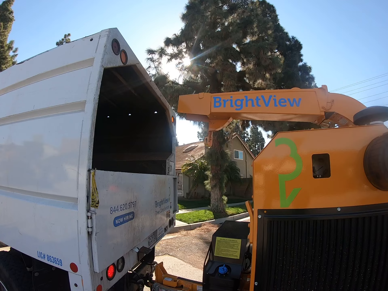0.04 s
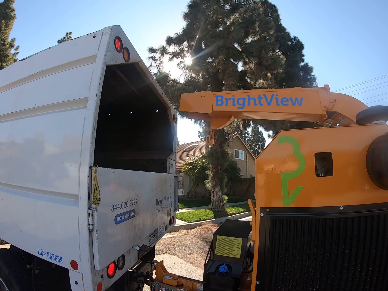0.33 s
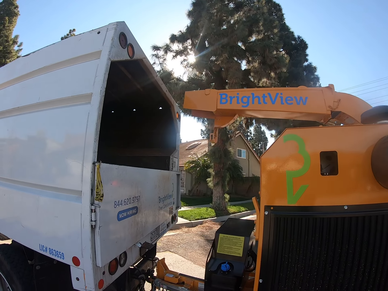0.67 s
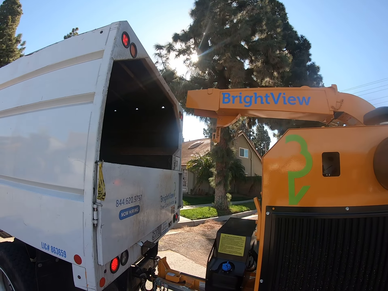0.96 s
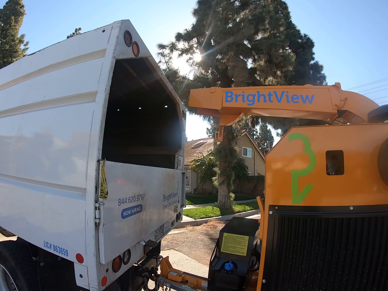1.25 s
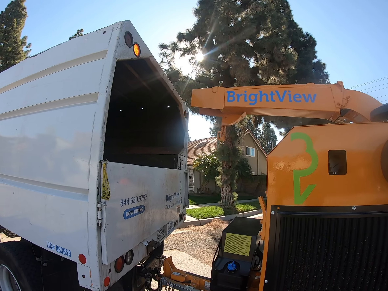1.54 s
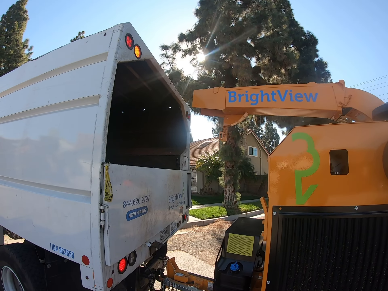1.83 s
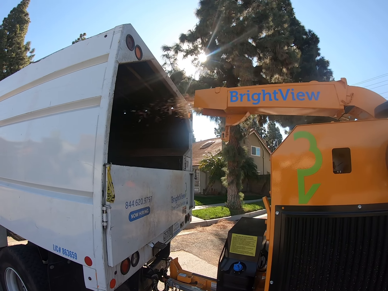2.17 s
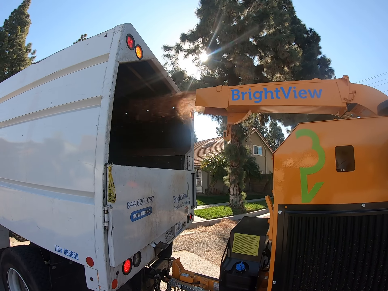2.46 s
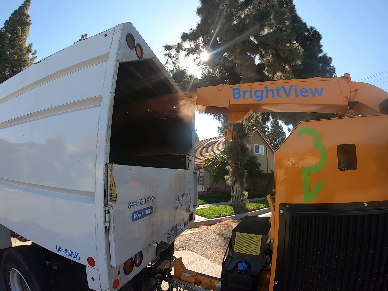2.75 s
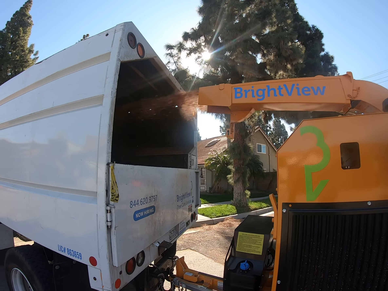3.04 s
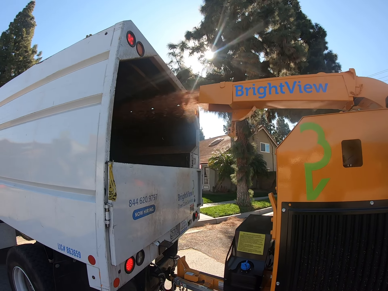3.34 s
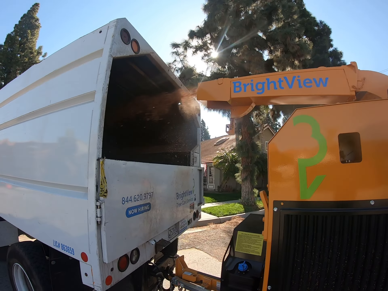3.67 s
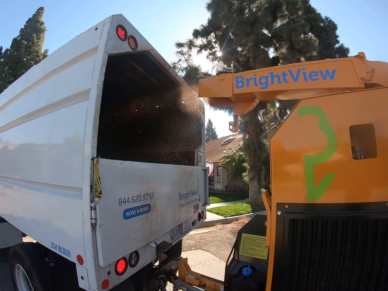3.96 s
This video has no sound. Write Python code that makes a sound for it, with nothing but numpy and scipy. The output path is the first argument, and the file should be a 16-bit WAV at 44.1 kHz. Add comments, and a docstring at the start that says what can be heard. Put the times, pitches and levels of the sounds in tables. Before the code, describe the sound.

A diesel wood chipper fades in at about 0.2 seconds, a strong steady hum over engine roar and faint air hiss. At 2.1 seconds a branch splinters and grinds through; the hum drops in pitch and fades as the engine labours. Chips spray into a truck, louder from 3 seconds, with a few metallic ticks. Low gusts buffet near 0.6 and 2.7 seconds, then the sound widens to stereo.

```python
"""Diesel wood chipper taking a branch

A chipper runs beside a truck, its drum chopping the air into one strong hum over the engine's tones
and roar. At 2.1 s a branch is fed in: the knives fracture it, the load drags the speed down and the
hum fades, while chips spray from the hissing chute into the truck box. A few gusts buffet low down.
The sound fades in mono and opens to stereo from 2.75 s."""
import sys
import numpy as np
from scipy import signal
from scipy.fft import rfft, irfft
from scipy.io import wavfile
from scipy.ndimage import uniform_filter1d, minimum_filter1d

SR = 44100
rng = np.random.default_rng(int(sys.argv[2]) if len(sys.argv) > 2 else 0)


def master_out(mix):
    """Clip the mix to full scale and print it as 16-bit PCM to the path in sys.argv[1]."""
    frames = np.transpose(np.atleast_2d(mix))
    ceiling = np.clip(frames, -1, 1)
    pcm = np.round(ceiling * 32767).astype(np.int16)
    wavfile.write(sys.argv[1], SR, pcm)


N = 176400
T = np.arange(N) / SR
HZ = np.fft.rfftfreq(N, 1 / SR)
CRACKS_PER_S, CRACK_SPREAD_DB = 9000, 2.5

# Drum hum, whose pitch also sets the engine speed: time_s, pitch_hz, level_db
DRUM_HUM = [(.25, 245.8, -9), (.8, 245.8, -12.5), (1.3, 245.8, -11), (1.65, 244, -11.5), (2.05, 245, -11.3),
            (2.35, 243.5, -12.5), (2.5, 239.8, -14), (2.75, 227.4, -15.5), (3.05, 219.1, -19),
            (3.3, 215.7, -25.5), (3.47, 215.3, -22), (4, 215.5, -23)]


def amp(db):
    """Decibels to amplitude ratio."""
    return 10 ** (np.asarray(db) / 20)


def curve(table, column=1):
    """Linear interpolation of a column over time."""
    rows = np.array(table, float)
    return np.interp(T, rows[:, 0], rows[:, column])


def over_hz(table, column=1):
    """Linear interpolation of a column over log frequency."""
    rows = np.array(table, float)
    return np.interp(np.log(HZ + 1), np.log(rows[:, 0]), rows[:, column])


def drift(rate_hz):
    """Low-pass noise: a random fluctuation of rms 1."""
    motion = irfft(rfft(rng.standard_normal(N)) / (1 + (HZ / rate_hz) ** 4), N)
    return motion / np.sqrt(np.mean(motion ** 2) + 1e-20)


def noise():
    """Two uncorrelated channels of white noise."""
    return rng.standard_normal((2, N))


def grains(per_s, spread_db):
    """Shot noise: random impulses, a few much larger than the rest."""
    sizes = amp(spread_db * np.minimum(rng.exponential(1, (2, N)), 5))
    return np.sign(noise()) * sizes * (rng.random((2, N)) < per_s / SR)


def panel_ripple(depth_db=1.5, spacing_hz=50):
    """Interference from nearby steel panels, as random spectral peaks and dips in dB."""
    knots = np.arange(0, SR, spacing_hz)
    return depth_db * np.interp(HZ, knots, rng.standard_normal(len(knots))) * np.minimum(HZ / 700, 1)


def coloured(pair, spectrum):
    """Partial coherence: two uncorrelated signals are filtered and mixed to stereo with a mid of rms 1."""
    # Stereo image: frequency_hz, coherence, left_minus_right_db, left_lead_rad
    image = [(100, 1, 1, 0), (380, .97, -.2, -0.07), (700, .8, -3, 0.56), (1310, 0.5, -8.5, -1.2),
             (2400, .62, -7, -0.25), (4530, .3, -1.5, -.9), (7300, .55, -3.5, -2.8), (10000, .35, -2, -5),
             (12000, .3, 1, 0.5)]
    common, separate = rfft(pair) * amp(over_hz(spectrum) + panel_ripple())
    coherence = np.clip(over_hz(image), 0, 1)
    lean = amp(over_hz(image, column=2)) * np.exp(1j * over_hz(image, column=3))
    left = lean * (coherence * common + np.sqrt(1 - coherence ** 2) * separate)
    sum_gain = np.sqrt(1 + abs(lean) ** 2 + 2 * coherence * lean.real)
    stereo = irfft(np.array([left, common]) / sum_gain, N)
    return stereo / np.std(stereo.mean(0))


def drum(phase, waver=0.05, octave_db=-19.5):
    """Periodic chopping of the air by the spinning drum radiates a nearly pure tone."""
    fundamental = np.sin(phase + waver * drift(7.3))
    octave = amp(octave_db) * np.sin(2 * phase + 0.32 * drift(4.6))
    return np.sqrt(2) * (fundamental + octave) * amp(curve(DRUM_HUM, column=2)) * (1 + waver * drift(9.1))


def engine_tones(crank, load):
    """Periodic firing gives harmonics of the crank rate, which waver more under load."""
    # Engine harmonics: cycles_per_turn, free_level_db, loaded_level_db
    orders = [(3, -44.5, -25), (4, -27, -27), (5, -29, -31), (6, -35.5, -28), (8, -26, -28),
              (9, -39.5, -35), (10, -29.5, -33), (11, -39.5, -39), (12, -40, -32), (14, -38.5, -38.5)]
    # Firing tone, two beats per crank turn: time_s, level_db
    firing_level = [(.25, -22), (.7, -29), (.9, -31), (1.3, -41), (1.65, -36.5), (1.9, -29), (2.5, -31),
                    (3.0, -38), (3.5, -22.5), (4, -30)]
    waver = 0.32 + 0.15 * load
    tones = 0
    for order, free_db, loaded_db in orders:
        gain = amp(free_db + (loaded_db - free_db) * load) * (1 + waver * drift(2.84))
        tones += gain * np.sin(order * crank + 2 * np.pi * rng.random() + waver * drift(3.9))
    firing = amp(curve(firing_level)) * np.sin(2 * crank + waver * drift(3))
    return np.sqrt(2) * (tones + firing)


def engine_roar(crank, load, pulse_depth=0.07, clatter_depth=0.065):
    """Broadband engine and fan noise is faintly amplitude-modulated at the crank and firing rates."""
    # Roar spectrum: frequency_hz, density_db
    spectrum = [(25, -36), (45, -17.5), (70, -9), (130, -2), (220, 0.5), (400, -1.5), (550, -7), (680, -8),
                (820, -11), (1300, -12.5), (2000, -15.5), (2900, -17.5), (3500, -24), (4100, -34),
                (6000, -52.5), (15000, -85.5)]
    pulsing = 1 + pulse_depth * (np.cos(crank) + np.cos(2 * crank)) + clatter_depth * drift(250)
    level_db = -17.5 - 0.5 * load + 0.3 * drift(12)
    return coloured(noise() * pulsing, spectrum) * amp(level_db)


def engine_throb(crank):
    """The labouring engine adds low noise, amplitude-modulated once per turn."""
    # Throb spectrum: frequency_hz, density_db
    spectrum = [(25, -25), (60, -7), (105, -4), (178, 1), (260, -5), (400, -10), (700, -22), (3000, -60)]
    # Throb, strongest while the speed is dragged down: time_s, level_db
    level = [(2.1, -45), (2.4, -25), (2.6, -21.5), (3.0, -20.5), (3.3, -24), (3.6, -25), (4, -25)]
    return coloured(noise() * (1 + 0.099 * np.cos(crank)), spectrum) * amp(curve(level))


def knives(phase, passes_per_hum_cycle=0.14, swing_db=1.9):
    """Fracturing wood emits dense impulsive cracks that swell with each knife pass."""
    # Bite of the knives: time_s, level_db
    bite = [(2.088, -67), (2.102, -23), (2.17, -23), (2.215, -24), (2.25, -30), (2.275, -22), (2.335, -21),
            (2.405, -28), (2.44, -22.5), (2.49, -21.5), (2.54, -20.5), (2.6, -21.5), (2.74, -24),
            (2.88, -22), (3.05, -26.5), (3.3, -29.5), (3.4, -26.5), (3.58, -35.5), (3.66, -25.5),
            (3.88, -24.5), (4, -36.5)]
    # Tearing wood: frequency_hz, density_db
    spectrum = [(100, -26.5), (400, -9), (800, -2), (1300, 1), (2200, -3.5), (3300, -9.5), (4200, -14.5),
                (5200, -16), (6200, -26.5), (8000, -26.5), (9000, -31.5), (14000, -49)]
    knife_phase = passes_per_hum_cycle * phase + 0.7 * drift(7.7)
    passes = amp(swing_db * np.cos(knife_phase) + 0.73 * drift(35))
    return coloured(grains(CRACKS_PER_S, CRACK_SPREAD_DB) * passes, spectrum) * amp(curve(bite))


def splits(attack_s=0.004, release_s=0.023):
    """Brittle fracture of the entering branch end releases short, bright bursts of cracks."""
    # Splits: start_s, length_s, level_db
    events = [(2.098, 0.12, -23), (2.27, 0.079, -25.5), (2.427, 0.026, -29)]
    # Splintering wood: frequency_hz, density_db
    spectrum = [(600, -22), (1400, -5), (1900, 2.5), (2600, 1), (3500, -4), (4200, -12), (5200, -12.5),
                (6200, -26), (8000, -27), (14000, -54)]
    bursts = 0
    for start_s, length_s, level_db in events:
        rise = np.clip((T - start_s) / attack_s, 0, 1)
        fall = np.exp(-np.maximum(T - start_s - length_s, 0) / release_s)
        bursts += amp(level_db) * rise * fall
    return coloured(grains(CRACKS_PER_S, CRACK_SPREAD_DB), spectrum) * bursts * amp(0.7 * drift(40))


def chips(knock_decay_s=0.02):
    """Many small impacts of chips and sawdust merge into noise; a few single strikes stand out."""
    # Chips spraying into the truck: time_s, level_db
    flow = [(2.07, -75), (2.12, -42), (2.3, -38), (2.45, -47), (2.7, -42.5), (3.0, -37), (3.14, -36),
            (3.38, -32), (3.58, -36.5), (3.67, -30.5), (3.72, -37), (3.78, -33.5), (3.87, -38.5),
            (4, -33.5)]
    # Chip impacts: frequency_hz, density_db
    chip_spectrum = [(500, -20.5), (2000, -9), (3400, 6.5), (4000, 3), (5300, 2.5), (6500, 0.5),
                     (7800, -0.5), (8800, -14), (10200, -13), (11500, -24), (13500, -30.5), (15500, -42)]
    # Fine sawdust in the spray: time_s, level_db
    dust_level = [(2.07, -90), (2.15, -64), (2.7, -58), (3.0, -52), (3.35, -50), (3.6, -49), (3.88, -55),
                  (4, -52)]
    # Sawdust hiss: frequency_hz, density_db
    dust_spectrum = [(4000, -19), (7500, -2), (10200, 0), (11500, -6.5), (13500, -8.5), (15500, -25.5)]
    # Single chips striking metal: start_s, level_db
    knocks = [(.757, -41), (2.272, -33), (3.198, -28), (3.647, -33), (3.905, -34)]
    spray = coloured(grains(per_s=10000, spread_db=3), chip_spectrum) * amp(curve(flow) + 0.91 * drift(30))
    dust = coloured(noise(), dust_spectrum) * amp(curve(dust_level))
    strikes = sum(amp(level_db) * (T >= start_s) * np.exp(-abs(T - start_s) / knock_decay_s)
                  for start_s, level_db in knocks)
    return spray + dust + coloured(noise(), chip_spectrum) * strikes


def chute(phase):
    """Turbulent air leaving the chute hisses, amplitude-modulated at the pitch of the hum."""
    # Air hiss: frequency_hz, density_db
    spectrum = [(2500, -27), (4000, -7.5), (4600, 1.5), (5200, -4.5), (5900, -16), (7800, -14),
                (8800, -22.5), (10200, -26), (11300, -39), (15000, -50.5)]
    # Strength of the hiss: time_s, level_db
    level = [(.2, -41), (.4, -43), (.7, -39.5), (2, -39), (4, -41.5)]
    return coloured(noise() * (1 + 0.17 * np.cos(phase)), spectrum) * amp(curve(level) + 0.51 * drift(22))


def wind():
    """Pressure fluctuations of gusts on the microphone make short, low buffets."""
    # Wind rumble: frequency_hz, density_db
    spectrum = [(20, -25), (40, -9.5), (68, 1.5), (95, -3.5), (160, -26), (600, -70)]
    # Gaussian gusts: centre_s, half_width_s, level_db
    gusts = [(.575, .05, -23), (.67, 0.1, -22), (2.66, .1, -24)]
    envelope = sum(amp(level_db) * np.exp(-2 * ((T - centre_s) / half_width_s) ** 2)
                   for centre_s, half_width_s, level_db in gusts)
    return coloured(noise(), spectrum) * envelope


def scene(hum_cycles_per_turn=6.735):
    """The sources superpose; a belt holds drum and crank at a fixed speed ratio."""
    # Engine load: time_s, load_fraction
    loading = [(2.15, 0.16), (2.5, 0.68), (3.0, 1)]
    load = np.clip(curve(loading), 0, 1)
    phase = 2 * np.pi * np.cumsum(curve(DRUM_HUM)) / SR
    crank = phase / hum_cycles_per_turn
    machine = drum(phase) + engine_tones(crank, load) + engine_roar(crank, load) + engine_throb(crank)
    return machine + chute(phase) + knives(phase) + splits() + chips() + wind()


def record(dry, ceiling=0.76, cutoff_hz=15600):
    """Mid-side scaling opens mono to stereo, followed by a fade-in, peak limiter and low-pass filter."""
    # Stereo width: time_s, side_gain
    width = [(2.75, 0), (3.0, .3), (3.3, .75), (3.75, 0.99)]
    # Fade-in: time_s, gain
    fade_in = [(.18, 0), (.2, 0.097), (.222, .45), (.25, 0.85), (.28, 1.04), (.4, 1)]
    mid = dry.mean(0)
    faded = (mid + (dry - mid) * curve(width)) * np.maximum(curve(fade_in), 0)
    allowed_gain = np.minimum(1, ceiling / (abs(faded).max(0) + 1e-9))
    limited = faded * uniform_filter1d(minimum_filter1d(allowed_gain, size=400), size=400)
    low_pass = signal.firwin(511, cutoff_hz, window=("kaiser", 9), fs=SR)
    return signal.oaconvolve(limited, low_pass[None], "same")


dry = scene()
out = record(dry)
master_out(out)
```